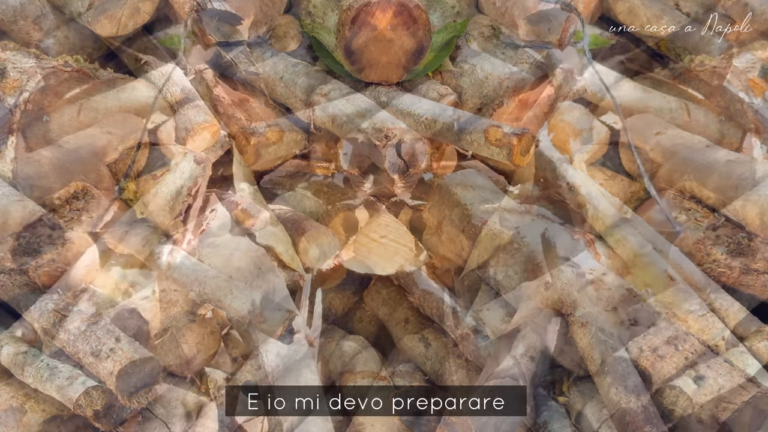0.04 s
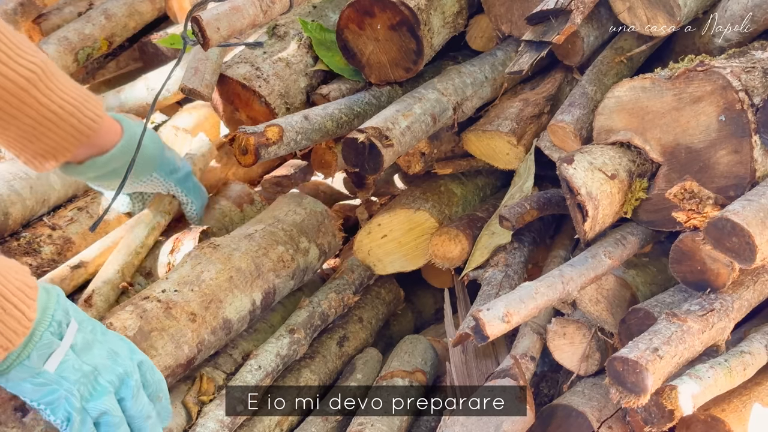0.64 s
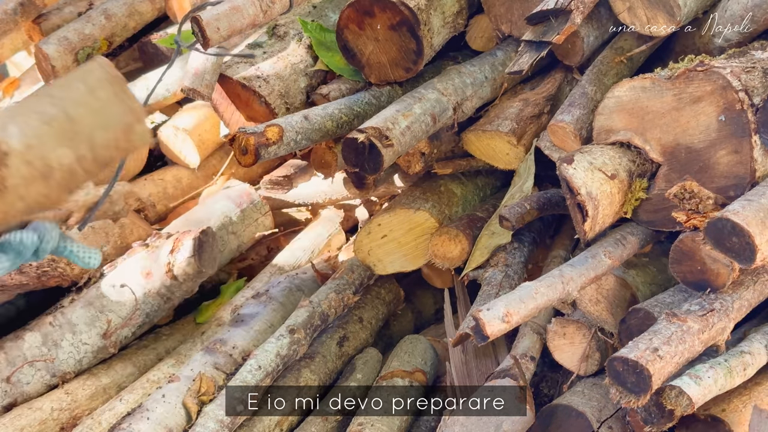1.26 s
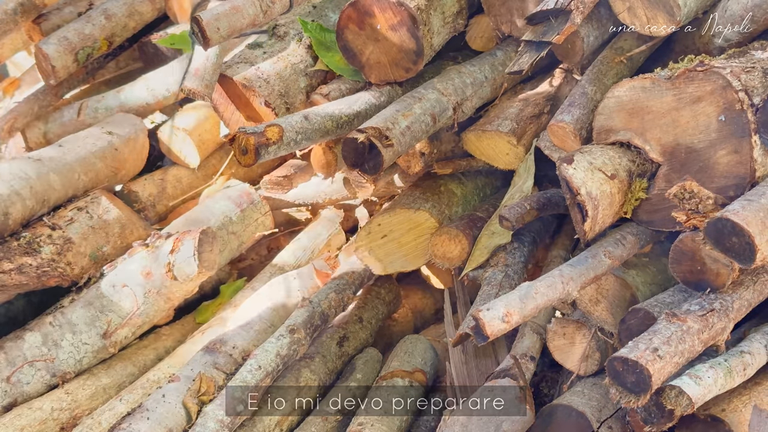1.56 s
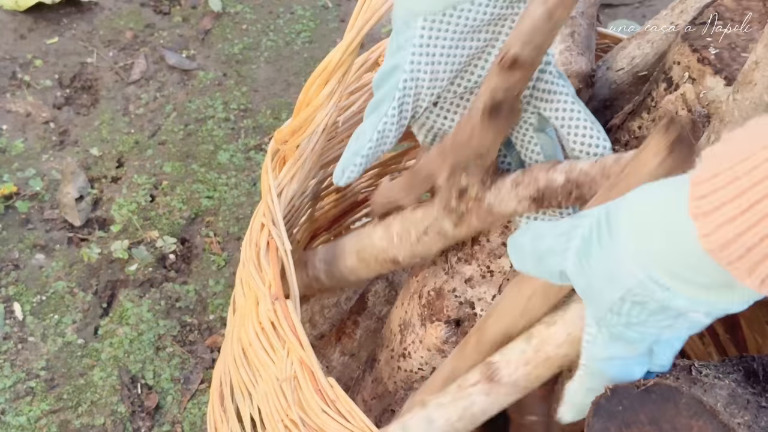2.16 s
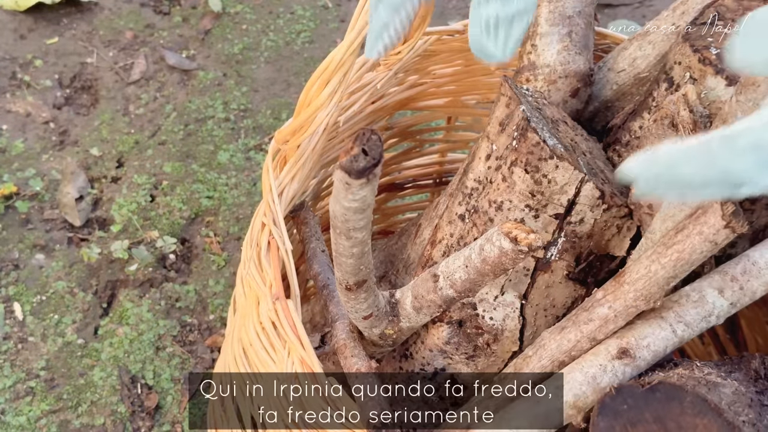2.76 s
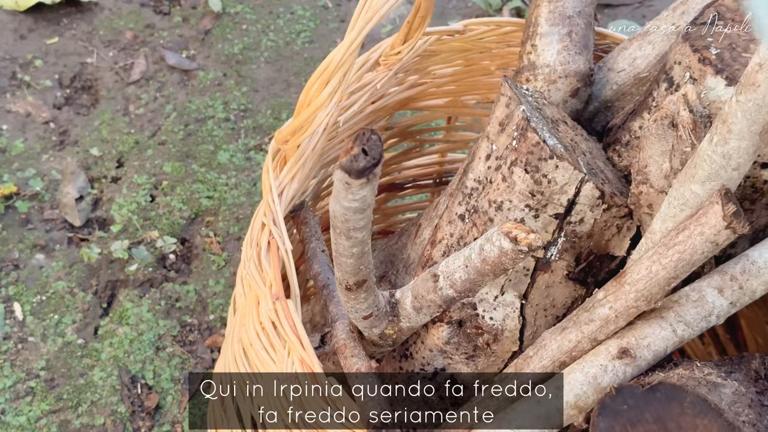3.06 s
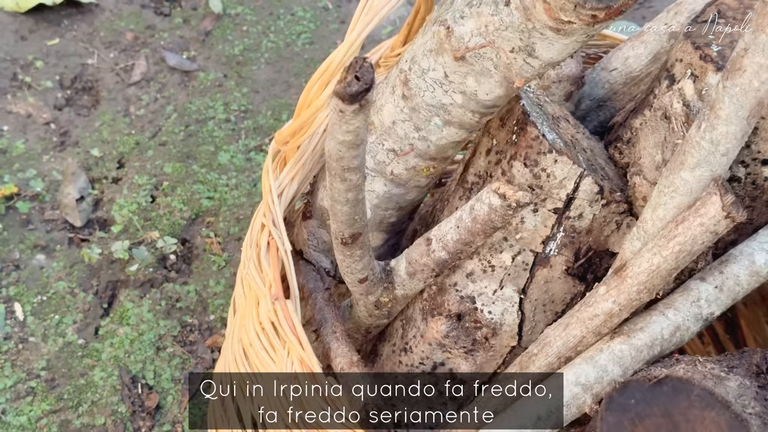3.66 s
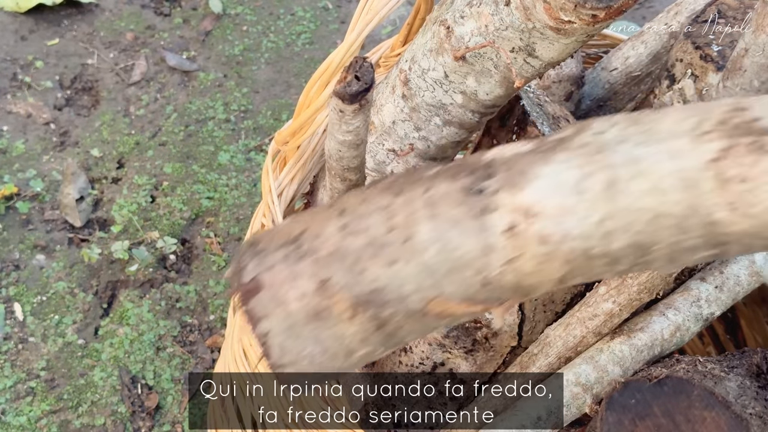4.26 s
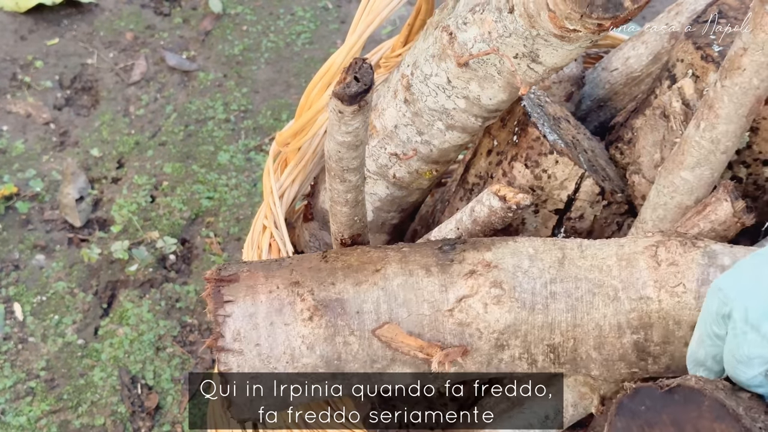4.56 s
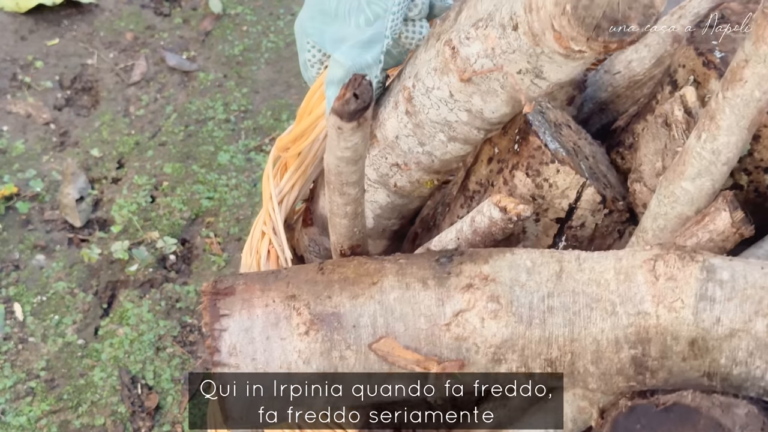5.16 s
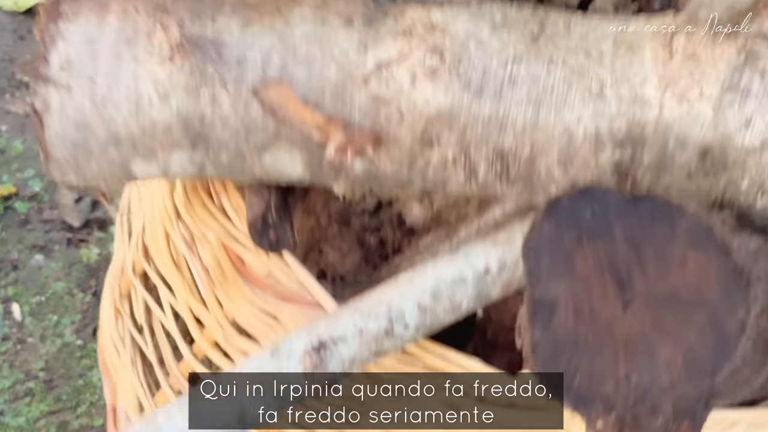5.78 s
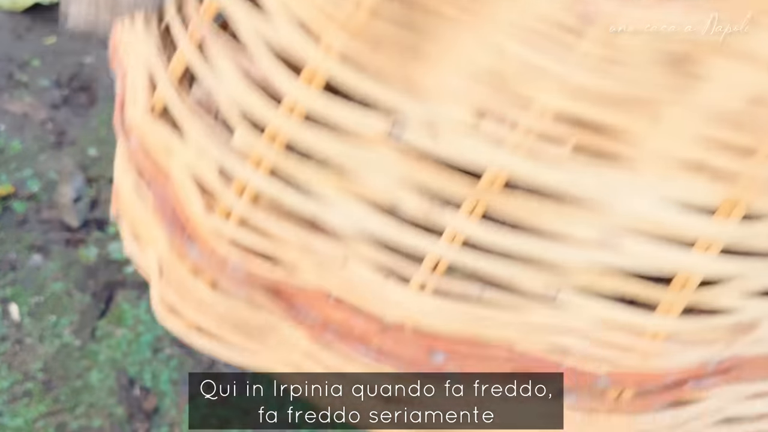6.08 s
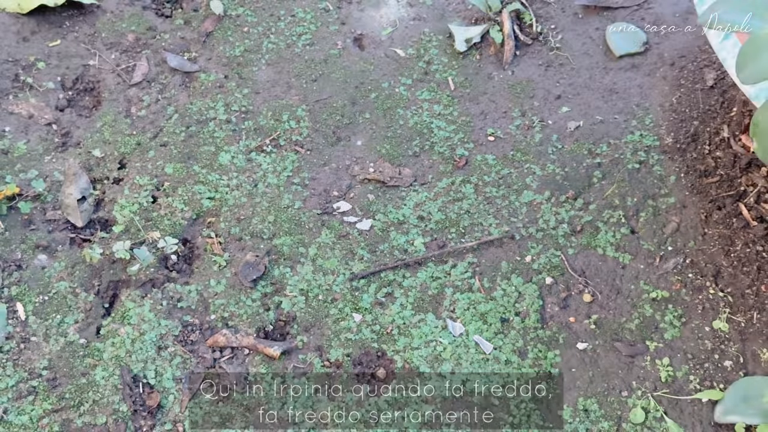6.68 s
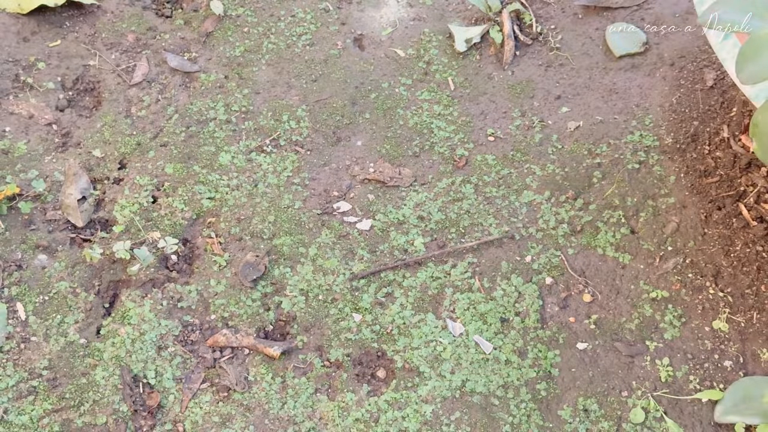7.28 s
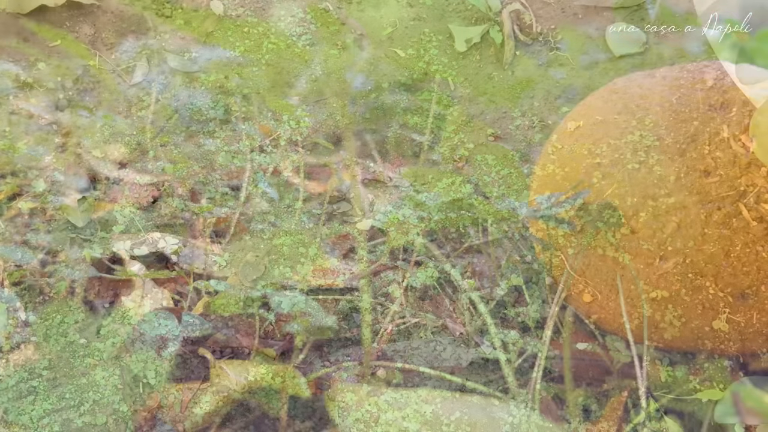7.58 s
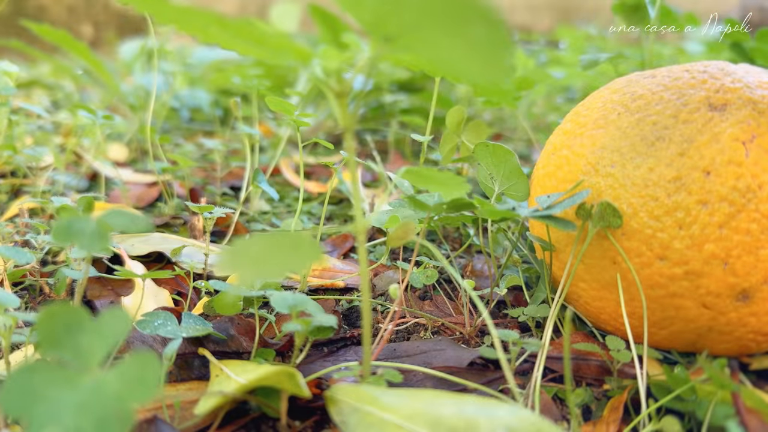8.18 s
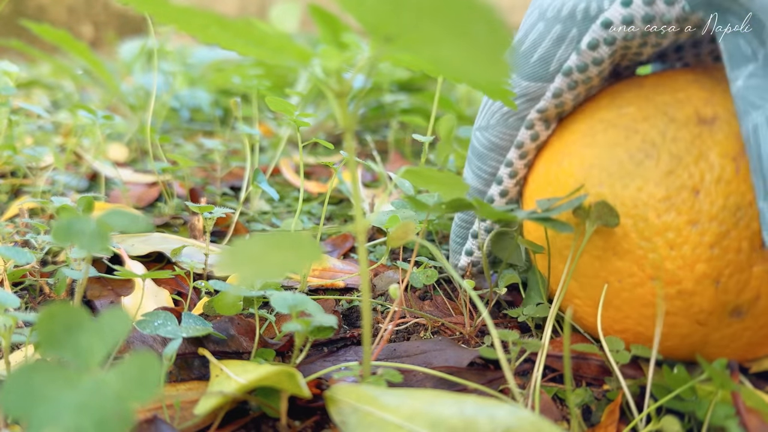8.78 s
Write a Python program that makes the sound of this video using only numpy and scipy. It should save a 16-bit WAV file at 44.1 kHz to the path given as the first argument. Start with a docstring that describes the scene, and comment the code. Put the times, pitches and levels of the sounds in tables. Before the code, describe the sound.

In a garden, dry firewood scrapes and knocks as it is pulled from a pile, then clatters into a wicker basket close to the microphone. One more log lands with a loud knock. The basket creaks, ticks and snaps as it is lifted and carried, and finally a glove brushes through leaves. Small birds chirp and trill throughout, one whistling nearby, over a low rumble that swells near the end.

```python
"""A stick scrapes and birds chirp; then firewood knocks as it is pulled off a pile and dropped into a
wicker basket, which creaks as it is lifted and carried away. The sticks thud, ring like free bars and rub
their bark; strained cane ticks and snaps; last, a glove brushes through leaves. One bird whistles close
by, others chirp and trill across the garden, over a low outdoor rumble that swells towards the end."""
import sys
import numpy as np
from scipy import signal
from scipy.fft import rfft, irfft, next_fast_len
from scipy.io import wavfile
from scipy.ndimage import map_coordinates

SR = 44100
rng = np.random.default_rng(int(sys.argv[2]) if len(sys.argv) > 2 else 0)


def master(y):
    """Save y as 16-bit WAV."""
    cut = np.clip(np.atleast_2d(y).T, -1, 1)
    pcm = np.round(cut * 32767)  # scale
    wavfile.write(sys.argv[1], SR, pcm.astype(np.int16))


N = 393813

# Wood on wood. Each row: start in seconds, level in dB, thud in Hz, stick pitch in Hz, ring in dB re thud.
BLOWS = [(.556, -41.5, 700, 617, -21), (.653, -32.5, 880, 737, -14), (.677, -25.5, 765, 758, -19),
         (.686, -29.5, 504, 628, -20), (.884, -39, 430, 728, -9), (.897, -35.5, 670, 387, -15),
         (1.1305, -21, 1480, 520, -14.5), (1.134, -21, 1700, 640, -13), (1.31, -51.5, 660, 580, 12.5),
         (1.388, -49, 1630, 561, 7.5), (1.435, -34.5, 725, 578, -14), (1.9, -37, 513, 588, -14),
         (2.0625, -26.5, 475, 586, 2.5), (2.0925, -14.5, 765, 562, -17), (2.12, -32, 2400, 569, 1),
         (2.163, -28, 563, 1410, 1), (2.199, -25, 2510, 571, -9), (2.211, -21, 840, 566, -15),
         (2.2615, -14.5, 1730, 587, -17), (2.285, -30.5, 1490, 615, -6.5), (2.345, -27, 684, 656, -8),
         (2.387, -30.5, 650, 584, -6.5), (2.429, -18, 606, 480, -38), (2.4345, -23.5, 715, 429, -9),
         (2.46, -17, 660, 564.6, -10.5), (2.462, -15, 1580, 1538, -6), (3.392, -53, 257, 386, -26),
         (4.373, -23, 980, 748, -16), (4.422, -25, 1180, 679, -11), (4.4568, -3, 710, 800, -38),
         (4.461, -25.5, 250, 435, -20)]
# Bending modes of a stick. Each row: multiple of its pitch, level in dB, t60 in seconds.
STICK_MODES = [(0.998, -1.5, 0.16), (2.701, -4.5, 0.14), (5.2, -14.5, 0.051)]
# Jostled sticks. Each row: frequency in Hz, level in dB.
CLATTER_SPECTRUM = [(60, 9.5), (200, 3.5), (700, 5.5), (1300, -2), (2100, -3), (2800, -10), (5000, -16.5),
                    (9000, -31.5), (16000, -81.5)]
# Boom of the loaded basket. Each row: frequency in Hz, level in dB.
BOOM_SPECTRUM = [(90, -29), (150, -4), (210, 5.5), (280, -0.5), (420, -18), (900, -63)]
# Scrapes that swell and stop: sticks sliding over others, and at 6.26 s the wicker rubbing as the basket is
# carried. Each row: peak time in seconds, level in dB.
SLIDE_PEAKS = [(.022, -46.5), (2.077, -38.5), (2.141, -30.5), (2.21, -38), (2.29, -32), (2.41, -52),
               (2.49, -50), (4.44, -43.5), (6.26, -44.5)]
# Sliding bark. Each row: frequency in Hz, level in dB.
SLIDE_SPECTRUM = [(50, -35.5), (170, -9.5), (350, -8.5), (650, 0), (1100, -6), (1800, -2.5), (3300, -5.5),
                  (5500, -8), (8500, -13.5), (12000, -14), (14500, -17), (16000, -34.5)]
# Rubs, one list per stroke: bark as sticks are pulled off the pile, then wicker as a log settles into the
# basket. Each row: time in seconds, scrape in dB, crackle in dB.
RUB_STROKES = [
    [(.6, -64, -83), (.746, -54.5, -69.5), (.81, -56.5, -76), (.952, -61, -93), (1.168, -67, -85),
     (1.322, -56.5, -74), (1.5, -58, -89), (1.626, -56, -73), (1.7, -75, -65)],
    [(2.48, -56.5, -56), (2.592, -59, -71), (2.692, -68.5, -56), (2.822, -58, -56), (2.9, -62, -92)],
    [(4.37, -61, -54.5), (4.44, -56.5, -55), (4.52, -62, -60), (4.6, -74.5, -86.5)],
]
# Dull scrape of bark and wicker. Each row: frequency in Hz, level in dB.
SCRAPE_SPECTRUM = [(100, -25), (250, -2.5), (700, -2.5), (1900, -1.5), (3000, -4.5), (6000, -13),
                   (16000, -28)]
# Bark crackle. Each row: frequency in Hz, level in dB.
CRACKLE_SPECTRUM = [(800, -20.5), (2500, 9.5), (5000, 1.5), (8000, -14), (10000, -25), (13500, -2),
                    (16000, 4)]

# Bark and wicker snaps. Each row: start in seconds, level in dB, brightness in dB, splinter share 0-1.
FIBRE_SNAPS = [(1.3449, -37, -16, .5), (2.1431, -25, 8.5, .06), (2.1984, -25, 4, .03),
               (2.2594, -25, 2, .02), (2.3427, -24.5, 4.5, .04), (2.385, -18, 3.5, .02),
               (2.7798, -42, -2.5, .2), (2.814, -41.5, 3.5, .05), (3.8318, -47, -9.5, .5),
               (4.3752, -25.5, 3.5, .7), (4.425, -35, 1.5, .5), (4.4587, -37, 8.5, .3),
               (4.5155, -43, 5, .85), (4.9958, -40.5, -1.5, .1), (5.021, -36, 5.5, .5),
               (5.137, -38, -1, .5), (5.175, -27.5, 0.5, .25), (5.34, -41, 10.5, 0.8),
               (5.3763, -45, 9, .75), (5.4583, -32, 3.5, .5), (5.4648, -26.5, -5.5, .9),
               (5.5807, -34, -1, .75), (5.7518, -36.5, 2.5, .65), (5.8722, -46.5, -12, .4),
               (5.9927, -47, -22, .7), (6.0868, -40.5, -14.5, .3), (6.0974, -40, -15.5, .9),
               (6.113, -35, -2.5, .9), (6.2306, -28, 4, .95), (6.284, -30.5, -18, .9),
               (6.4017, -40.5, -2, 0.87), (6.5328, -40.5, 1, .6), (6.6471, -37, 4, .95),
               (6.755, -43, 1, 0.4), (6.705, -34.5, 0.5, .95), (7.0103, -34, -2, .4), (7.184, -44, 3, .3),
               (7.5132, -28.5, -14.5, 0.6)]
# Four bands of a snap, cane body to finest splinters. Each row: frequency in Hz, level in dB.
WOODY_SPECTRUM = [(100, -0.5), (400, -9), (1100, -4), (2000, 3), (3200, -5), (7000, -47)]
SHARP_SPECTRUM = [(1200, -19.5), (3000, -6), (5000, -3), (7500, -6), (11000, -27)]
FIZZ_SPECTRUM = [(6000, -38), (9000, 3), (12000, -0.5), (14000, -6)]
SPLINTER_SPECTRUM = [(11000, -36), (13300, 8.5), (15500, 7.5), (16200, -23.5)]
# The handle cracks under load. Each row: start in seconds, level in dB.
HANDLE_CRACKS = [(6.27, -27), (6.285, -18), (7.262, -33), (7.276, -32), (7.5114, -15.5)]
# Handle ring. Each row: frequency in Hz, level in dB, t60 in seconds.
HANDLE_MODES = [(2020, 1, 0.012), (1861, -16, 0.06), (1160, -21, .015)]
# Basket gripped, lifted, carried. Each row: time in seconds, scrape in dB, crackle in dB.
WICKER_STRAIN = [(4.95, -82, -70), (5.04, -62, -63), (5.18, -58.5, -56), (5.31, -52, -51),
                 (5.42, -60, -62.5), (5.7, -60.5, -75), (5.97, -70, -83), (6.24, -49.5, -68),
                 (6.36, -62.5, -80), (6.55, -56, -61), (7.07, -59, -62.5), (7.29, -52.5, -62),
                 (7.65, -62, -72.5)]
# Cane clicks. Each row: frequency in Hz, level in dB.
WICKER_SPECTRUM = [(800, -14), (2500, 6), (5000, 4), (7500, 3), (9000, 9.5), (11500, -19), (13500, 8),
                   (16000, -1)]
# Groan of the flexing weave. Each row: frequency in Hz, level in dB.
GROAN_SPECTRUM = [(120, -25), (190, -11), (255, 3), (330, -6.5), (480, -9), (800, -20), (1500, -47)]
# Course of the groan. Each row: time in seconds, level in dB.
GROAN_ENVELOPE = [(5, -90), (5.3, -64), (5.75, -61.5), (6.3, -64.5), (6.9, -74)]
# Glove in leaves, one list per stroke. Each row: time in seconds, scrape in dB, crackle in dB.
GLOVE_STROKES = [
    [(8.42, -66, -81), (8.5, -52.5, -66), (8.58, -51, -53.5), (8.66, -55.5, -51.5), (8.73, -61.5, -65),
     (8.93, -65, -82)],
]
# Glove scrape and leaf crackle. Each row: frequency in Hz, level in dB.
GLOVE_SPECTRUM = [(300, -35), (520, -4.5), (720, 5), (950, -7), (1500, -15.5), (4000, -27), (9000, -39)]
LEAF_SPECTRUM = [(2000, -36), (6500, 12.5), (10000, 1.5), (13500, 10), (16000, -10)]

# Near bird. Each row: start and length in seconds, pitch in Hz, scoop from below as a share of pitch,
# level in dB, swell in dB, third harmonic in dB.
WHISTLE_NOTES = [(1.783, 0.131, 3577, -.1, -41.5, 20, -72.5), (1.916, .162, 3061, 0.49, -30.5, 2, -35.5),
                 (2.533, 0.33, 2770, -0.0055, -60, -7, -60), (6.69, .17, 1530, -.04, -60.5, 0, -40)]
# Falling call. Each row: delay and length in seconds, pitch in Hz, level in dB.
CALL_NOTES = [(0, 0.043, 2784, -34.5), (.036, .036, 2240, -43.5), (0.054, 0.091, 1885, -48.5)]
# Falling calls. Each entry: start in seconds.
CALL_STARTS_S = [6.851, 6.987]
# Far birds. Each row: start in seconds, note count, syllable name, middle pitch in Hz, level in dB.
FAR_CHIRPS = [(.06, 1, "up", 4100, -55), (.172, 1, "arch", 4630, -55.5), (1.891, 2, "slur", 5830, -52.5),
              (3.192, 1, "arch", 4600, -57), (3.472, 1, "arch", 6040, -60), (3.6, 2, "pip", 7000, -61),
              (3.666, 2, "down", 4300, -52.5), (3.715, 2, "down", 5640, -57.5),
              (3.843, 3, "pip", 3647, -53.5), (3.908, 3, "up", 4660, -53.5), (3.963, 2, "up", 5770, -59),
              (4.157, 1, "down", 5500, -59), (4.245, 1, "down", 4370, -53), (4.921, 1, "arch", 4530, -57),
              (5.542, 1, "down", 4280, -52), (5.652, 1, "down", 5640, -61.5), (5.722, 3, "pip", 3920, -60),
              (5.794, 2, "up", 5150, -60.5), (6.17, 1, "down", 4470, -52.5), (7.707, 1, "down", 4380, -57),
              (7.895, 3, "pip", 3724, -57.5), (7.968, 3, "up", 4840, -58), (8.204, 1, "down", 4270, -55),
              (8.56, 1, "up", 4160, -56.5), (8.876, 1, "arch", 4730, -56)]
# Chirps by name. Each row: length in seconds, start and end pitch over middle pitch, period in seconds.
SYLLABLE_SHAPES = {"down": (0.034, 1.29, 0.8, .116), "up": (0.021, .89, 1.1, .14),
                   "pip": (.03, .98, 0.91, .135), "arch": (0.034, 0.89, 0.82, .12),
                   "slur": (0.079, 1.09, .98, 0.12)}
# Trills. Each row: start, stop, period and length in seconds, start, middle and end in Hz, level in dB.
TRILL_RUNS = [(0.007, .42, 0.12, 0.036, 3180, 3510, 4300, -52),
              (2.097, 2.44, 0.007, 0.011, 5270, 4500, 3940, -42.5),
              (2.515, 2.88, 0.052, 0.032, 2704, 3020, 3660, -52.5),
              (4.497, 5.02, 0.12, 0.032, 3110, 3660, 3970, -53),
              (4.58, 4.9, 0.11, 0.044, 4420, 3350, 2980, -63),
              (7.196, 7.67, .0304, .025, 6790, 7170, 7200, -51.5),
              (7.201, 7.68, 0.033, 0.014, 5900, 5860, 5500, -51.5),
              (7.204, 7.66, .013, 0.0068, 5780, 4450, 3000, -53),
              (7.2158, 7.68, 0.037, 0.0089, 6330, 3760, 2150, -47)]

# Low rumble, distant roar, still air, haze of birdsong. Each row: frequency in Hz, level in dB.
RUMBLE_SPECTRUM = [(13, -18), (22, -1.5), (37, -1.5), (54, 2), (64, 1), (80, -4), (113, -8.5), (182, -25),
                   (200, -48.5), (260, -90), (440, -120)]
ROAR_SPECTRUM = [(41, -44.5), (70, -3.5), (87, -6.5), (198, 2.5), (259, -12), (327, -13.5), (445, -25),
                 (642, -34.5), (700, -34), (910, -40), (1540, -120)]
AIR_SPECTRUM = [(100, -14), (300, 8), (700, 0.5), (1500, -0.5), (2500, 0.5), (5000, -6.5), (7000, -6),
                (9000, -14.5), (16000, -22)]
HAZE_SPECTRUM = [(1800, -22), (2800, -11), (3700, -4), (4500, -10), (5500, -22), (7200, -38), (9000, -41.5)]
# Course of rumble, roar and remote twitter. Each row: time in seconds, level in dB.
RUMBLE_ENVELOPE = [(0, -49.5), (.7, -47), (2.9, -50), (4, -45), (4.9, -50), (5.7, -46.5), (7.5, -48),
                   (8, -41.5), (8.93, -37.5)]
ROAR_ENVELOPE = [(0, -63.5), (4.9, -68.5), (5.7, -61), (7.03, -59), (7.55, -40.5), (8.93, -39)]
CHORUS_ENVELOPE = [(0, -64.5), (3.3, -57.5), (4, -58.5), (7.4, -67.5), (7.8, -64.5), (8.93, -60)]
# Echo off trees and walls. Each row: frequency in Hz, unscaled t60 in seconds.
ECHO_DECAY = [(150, 0.69), (1000, 0.25), (3000, 0.71), (7000, 0.56), (15000, 0.2)]
# Stereo width of close sounds. Each row: frequency in Hz, side re middle in dB.
CLOSE_WIDTH = [(100, -22), (400, -13), (700, -12), (1300, -3), (2400, -11.5), (4400, -13.5), (8000, 1),
               (15000, -1)]


def knocks(contact_cycles=0.55, thud_cycles=16.5, clatter_db=-18.5, clatter_slope=0.59, boom_db=-24):
    """Each blow thuds, rings the stick, jostles its neighbours and shakes the basket."""
    out, t = np.zeros(N), np.arange(SR // 3) / SR
    for start_s, db, thud_hz, stick_hz, ring_db in BLOWS:
        thud = np.sin(2 * np.pi * thud_hz * t) * decay(t, thud_cycles / thud_hz)
        clatter = noise(CLATTER_SPECTRUM, len(t)) * decay(t, t60_s=0.073)
        boom = noise(BOOM_SPECTRUM, len(t)) * decay(t, t60_s=0.089)
        contact = 1 - np.exp(-(t * thud_hz / contact_cycles) ** 2)  # longer contact, lower thud
        blow = amp(db) * (thud + amp(ring_db) * stick_ring(t, stick_hz) + amp(boom_db) * boom)
        add(out, start_s, contact * (blow + amp(clatter_db + clatter_slope * db) * clatter))
    return out


def stick_ring(t, pitch_hz, damping_hz=3200):
    """A free bar rings in bending modes of random strength; bark muffles the highest."""
    ring = np.zeros(len(t))
    for multiple, db, t60_s in STICK_MODES:
        hz = pitch_hz * multiple
        gain = amp(db + rng.standard_normal()) / (1 + (hz / damping_hz) ** 4)
        ring += gain * np.sin(2 * np.pi * hz * t) * decay(t, t60_s)
    return ring


def slides(attack_s=0.024, release_s=0.029, ring_db=-9, boom_db=-12):
    """A sliding stick scrapes, which keeps it ringing and the basket booming."""
    t, pressure = np.arange(N) / SR, np.zeros(N)
    for peak_s, db in SLIDE_PEAKS:
        falloff = np.maximum((peak_s - t) / attack_s, (t - peak_s) / release_s)
        pressure = np.maximum(pressure, amp(db) * np.exp(-np.minimum(falloff, 20)))
    scrape = pressure * slips(SLIDE_SPECTRUM, rate_per_s=1000, scatter_db=4)
    stick = stick_ring(np.arange(SR // 3) / SR, pitch_hz=565)
    ring = np.std(scrape) * unit(signal.fftconvolve(scrape, stick)[:N])
    boom = pressure * noise(BOOM_SPECTRUM)
    return scrape + amp(ring_db) * ring + amp(boom_db) * boom


def rubbing(strokes, scrape_spectrum, crackle_spectrum, rate_per_s, scatter_db, scrape_db, crackle_db):
    """Surfaces catch and slip: a dull scrape under tiny clicks."""
    scrape_gain, crackle_gain = np.sum([envelopes(rows) for rows in strokes], axis=0)
    scrape = scrape_gain * slips(scrape_spectrum, rate_per_s, scatter_db=-6.5)
    crackle = crackle_gain * slips(crackle_spectrum, rate_per_s, scatter_db)
    return amp(scrape_db) * scrape + amp(crackle_db) * crackle


def slips(spectrum, rate_per_s, scatter_db, t60_s=0.019):
    """Slips of random size and timing, each a decaying rasp cut off at 5 ms."""
    sizes = amp(scatter_db * np.minimum(rng.standard_normal(N), 2.3))
    impulses = (rng.random(N) < rate_per_s / SR) * sizes
    rasp = decay(np.arange(SR // 200) / SR, t60_s)
    power = np.convolve(impulses ** 2, rasp ** 2)[:N]
    return colour(np.sqrt(power) * rng.standard_normal(N), spectrum)


def handle(attack_s=0.00039):
    """Thick cane gives way with a short, hard ring."""
    out, t = np.zeros(N), np.arange(SR // 6) / SR
    ring = sum(amp(db) * np.sin(2 * np.pi * hz * t) * decay(t, t60_s) for hz, db, t60_s in HANDLE_MODES)
    for start_s, db in HANDLE_CRACKS:
        add(out, start_s, amp(db) * ring * (1 - np.exp(-t / attack_s)))
    return out


def snap(bright_db, splinter_share, attack_s=0.001, shiver_db=-9.5):
    """A fibre cracks and the weave shivers; thinner fibres have less body, more top."""
    t = np.arange(SR // 6) / SR
    bands = WOODY_SPECTRUM, SHARP_SPECTRUM, FIZZ_SPECTRUM, SPLINTER_SPECTRUM
    woody, sharp, fizz, splinters = (noise(band, len(t)) for band in bands)
    top = np.sqrt(1 - splinter_share) * fizz + np.sqrt(splinter_share) * splinters
    burst = amp(-4 - 0.53 * bright_db) * woody + sharp + amp(-4 + bright_db) * top
    envelope = decay(t, t60_s=0.011) + amp(shiver_db) * decay(t, t60_s=0.089)
    return burst * (1 - np.exp(-t / attack_s)) * envelope


def snaps(small_count=10, small_db=-46, lift_s=5.05, stop_s=7.15):
    """Loud snaps of bark and wicker, plus small ones scattered through the carrying."""
    out = np.zeros(N)
    for start_s, db, bright_db, splinter_share in FIBRE_SNAPS:
        add(out, start_s, amp(db) * snap(bright_db, splinter_share))
    slot_s = (stop_s - lift_s) / small_count
    for slot, (offset, splinter_share) in enumerate(rng.random((small_count, 2))):
        db, bright_db = rng.normal(small_db, 3), rng.normal(-5, 4)
        add(out, lift_s + (slot + offset) * slot_s, amp(db) * snap(bright_db, splinter_share))
    return out


def weave(tick_db=-1):
    """Canes tick against each other; the loaded basket groans."""
    _, strain = envelopes(WICKER_STRAIN)
    ticks = strain * slips(WICKER_SPECTRUM, rate_per_s=70, scatter_db=4, t60_s=0.004)
    groan = envelopes(GROAN_ENVELOPE)[0] * slips(GROAN_SPECTRUM, rate_per_s=120, scatter_db=8)
    return amp(tick_db) * ticks + groan


def friction():
    """Sliding sticks, rubbing bark, straining wicker and a glove among leaves."""
    sticks = slides()
    bark = rubbing(RUB_STROKES, SCRAPE_SPECTRUM, CRACKLE_SPECTRUM,
                   rate_per_s=600, scatter_db=6, scrape_db=-1, crackle_db=3)
    wicker = rubbing([WICKER_STRAIN], SCRAPE_SPECTRUM, WICKER_SPECTRUM,
                     rate_per_s=520, scatter_db=4.5, scrape_db=-2.5, crackle_db=4)
    glove = rubbing(GLOVE_STROKES, GLOVE_SPECTRUM, LEAF_SPECTRUM,
                    rate_per_s=1600, scatter_db=2, scrape_db=0, crackle_db=-5.5)
    return sticks + bark + wicker + weave() + glove


def near_bird():
    """Long whistles that swell, hold or fade."""
    out = np.zeros(N)
    for start_s, length_s, hz, scoop, db, swell_db, third_db in WHISTLE_NOTES:
        note = whistle(length_s, hz, scoop, third_db, waver=0.001, taper=0.34)
        add(out, start_s, amp(db + swell_db * np.linspace(-0.5, 0.5, len(note))) * note)
    return out


def falling_call():
    """Three soft-edged notes step down, twice in a row."""
    out = np.zeros(N)
    for start_s in CALL_STARTS_S:
        for delay_s, length_s, hz, db in CALL_NOTES:
            note = whistle(length_s, hz, scoop=0.03, third_db=-32, waver=0.006, taper=0.66)
            add(out, start_s + delay_s, amp(db) * note)
    return out


def whistle(length_s, hz, scoop, third_db, waver, taper, scoop_s=0.0062, flutter_db=1.46, knots_per_s=88):
    """A clear note settles on its pitch and trembles."""
    t = np.arange(round(length_s * SR)) / SR
    flutter, drift = (map_coordinates(knots, [t * knots_per_s], mode="mirror")
                      for knots in rng.standard_normal((2, 32)))
    pitch_hz = hz * (1 - scoop * np.exp(-t / scoop_s) + waver * drift)
    return amp(flutter_db * flutter) * bird_tone(pitch_hz, third_db, taper)


def far_birds():
    """Quick slurred chirps, each kind repeated at its own pace."""
    out = np.zeros(N)
    for start_s, count, kind, hz, db in FAR_CHIRPS:
        length_s, start_ratio, end_ratio, period_s = SYLLABLE_SHAPES[kind]
        for k in range(count):
            note = syllable(length_s, [hz * start_ratio, hz, hz * end_ratio], waver=0.014, taper=0.6)
            add(out, start_s + k * period_s, amp(db) * note)
    return out


def trills(jitter_periods=0.023):
    """One syllable repeats, slightly uneven; the fastest runs fuse into a buzz."""
    out = np.zeros(N)
    for start_s, stop_s, period_s, length_s, *pitches_hz, db in TRILL_RUNS:
        for beat_s in np.arange(start_s, stop_s, period_s):
            note = syllable(length_s, pitches_hz, waver=0.025, taper=0.9)
            onset_s = beat_s + period_s * rng.normal(0, jitter_periods)
            add(out, onset_s, amp(db + rng.standard_normal()) * note)
    return out


def chorus(count=330, centre_hz=4100, length_s=0.03, gain_db=-1):
    """Many remote birds blur into a twitter."""
    out = np.zeros(N)
    starts_s = rng.uniform(0, N / SR, count)
    for start_s, (height, size, *bend) in zip(starts_s, rng.standard_normal((count, 5))):
        pitches_hz = centre_hz * np.exp(0.14 * height + 0.12 * np.array(bend))
        add(out, start_s, amp(2 * size) * syllable(length_s, pitches_hz, waver=0.038, taper=0.68))
    twitter = unit(garden(out, wet_db=2, left_db=1, t60_scale=0.4))
    return amp(gain_db) * envelopes(CHORUS_ENVELOPE)[0] * twitter


def syllable(length_s, pitches_hz, waver, taper):
    """A note bends through three pitches; fast waver makes it raspy."""
    progress = np.linspace(0, 1, max(round(length_s * SR), 8))
    glide_hz = np.polyval(np.polyfit([0, 0.5, 1], pitches_hz, 2), progress)
    knots = rng.standard_normal(len(progress) // 64 + 2)
    drift = np.interp(progress, np.linspace(0, 1, len(knots)), knots)
    return bird_tone(glide_hz * (1 + waver * drift), third_db=-60, taper=taper)


def bird_tone(pitch_hz, third_db, taper):
    """Sine plus third harmonic; taper is the share spent fading in and out."""
    phase = 2 * np.pi * np.cumsum(pitch_hz) / SR
    envelope = np.sqrt(2) * signal.windows.tukey(len(phase), taper)
    return envelope * (np.sin(phase) + amp(third_db) * np.sin(3 * phase))


def outdoors(rumble_db=1, roar_db=2, haze_db=-66, air_db=-62.5):
    """Low rumble, a distant roar that swells late, a haze of birdsong and still air."""
    rumble = envelopes(RUMBLE_ENVELOPE)[0] * stereo_noise(RUMBLE_SPECTRUM, side_db=-22)
    roar = envelopes(ROAR_ENVELOPE)[0] * stereo_noise(ROAR_SPECTRUM, side_db=-15)
    haze = stereo_noise(HAZE_SPECTRUM, side_db=-4.5)
    air = stereo_noise(AIR_SPECTRUM, side_db=-1.5)
    return amp(rumble_db) * rumble + amp(roar_db) * roar + amp(haze_db) * haze + amp(air_db) * air


def garden(x, wet_db, left_db, t60_scale=1):
    """Pan a source and add its echo off trees and walls, 5 ms late."""
    hz, t, bins = signal.stft(rng.standard_normal((2, SR)), SR, nperseg=256)
    t60_s = t60_scale * log_interp(ECHO_DECAY, hz)[:, None]
    _, tail = signal.istft(bins * np.exp(-np.log(1000) * t / t60_s), SR, nperseg=256)
    delayed = np.pad(x, (SR // 200, 0))[None]
    echo = signal.fftconvolve(delayed, tail / np.linalg.norm(tail[0]), axes=1)[:, :N]
    return pan(x + amp(wet_db) * spread(echo, side_db=-4.5), left_db)


def mic_ports(x):
    """Close sound reaches the two microphone ports out of step, more so in the treble."""
    size = next_fast_len(N + SR // 2)
    side = 1j * amp(log_interp(CLOSE_WIDTH, np.fft.rfftfreq(size, 1 / SR)))
    return irfft(rfft(x, size) * [1 + side, 1 - side], size)[:, :N]


def amp(db):
    """Decibels to gain."""
    return 10 ** (np.asarray(db) / 20)


def unit(x):
    """Scale to rms 1."""
    return x / np.sqrt(np.mean(x ** 2) + 1e-20)


def decay(t, t60_s):
    """Exponential fall, 60 dB in t60_s."""
    return np.exp(-np.log(1000) * t / t60_s)


def log_interp(points, hz):
    """Interpolate (Hz, value) points on a log axis."""
    knots_hz, values = np.transpose(points)
    return np.interp(np.log(hz + 1), np.log(knots_hz + 1), values)


def envelopes(rows):
    """Gain per sample for each dB column, silent outside the rows."""
    times_s, *columns = np.transpose(rows)
    return [amp(np.interp(np.arange(N) / SR, times_s, db, left=-140, right=-140)) for db in columns]


def add(track, start_s, x):
    """Mix x into the track."""
    first = max(0, round(start_s * SR))
    part = track[first:first + len(x)]
    part += x[:len(part)]


def colour(x, spectrum):
    """Filter x by the spectrum, to rms 1."""
    length = x.shape[-1]
    size = next_fast_len(length)
    response = amp(log_interp(spectrum, np.fft.rfftfreq(size, 1 / SR)))
    return unit(irfft(rfft(x, size) * response, size)[..., :length])


def noise(spectrum, shape=N):
    """Coloured noise at rms 1."""
    return colour(rng.standard_normal(shape), spectrum)


def stereo_noise(spectrum, side_db):
    """Steady stereo noise."""
    return spread(noise(spectrum, (2, N)), side_db)


def spread(pair, side_db):
    """Middle and side to left and right."""
    middle, side = pair[0], amp(side_db) * pair[1]
    return np.array([middle + side, middle - side])


def pan(x, left_db):
    """Set the gain of left re right."""
    return x * amp([[left_db / 2], [-left_db / 2]])


def scene():
    """Wood just under the microphones, birds around."""
    blows = garden(knocks(), wet_db=-18.5, left_db=0.1)
    cracks = garden(handle(), wet_db=-13, left_db=-2.5, t60_scale=0.48)
    fibres = garden(snaps(), wet_db=-14, left_db=1, t60_scale=0.86)
    wood = mic_ports(blows + cracks + fibres + friction())
    whistles = garden(near_bird(), wet_db=-19, left_db=-3.5)
    calls = garden(falling_call(), wet_db=-19, left_db=-1.5)
    chirps = garden(far_birds(), wet_db=-2.5, left_db=5, t60_scale=0.4)
    trilling = garden(trills(), wet_db=-3.5, left_db=0.5, t60_scale=0.37)
    return wood + whistles + calls + chirps + trilling + chorus() + outdoors()


def record(dry, low_cut_hz=33, top_hz=16150):
    """The microphones lose the deepest bass and the extreme treble; the right is slightly louder."""
    size = next_fast_len(N + SR // 2)
    hz = np.fft.rfftfreq(size, 1 / SR)
    response = (hz < top_hz) * (1 - 1 / (1 + (hz / low_cut_hz) ** 6))
    return pan(irfft(rfft(dry, size) * response, size)[:, :N], left_db=-1)


dry = scene()
out = record(dry)
master(out)
```